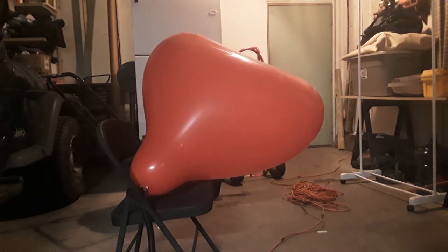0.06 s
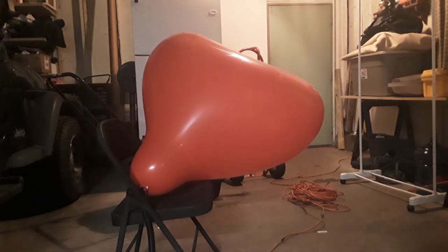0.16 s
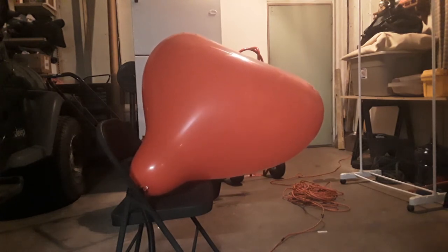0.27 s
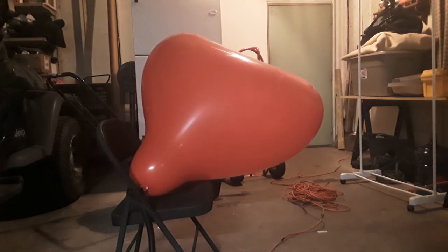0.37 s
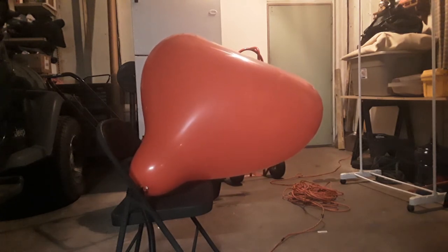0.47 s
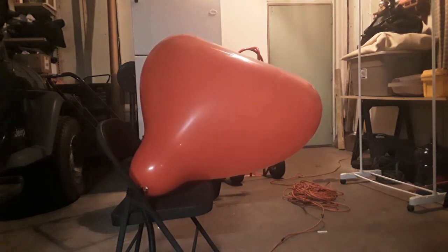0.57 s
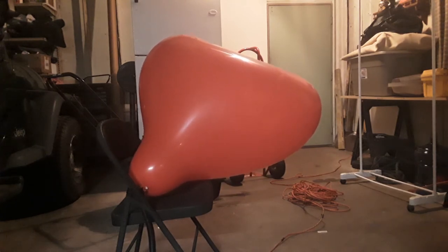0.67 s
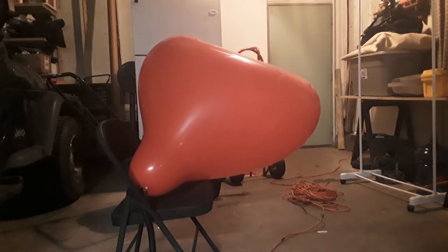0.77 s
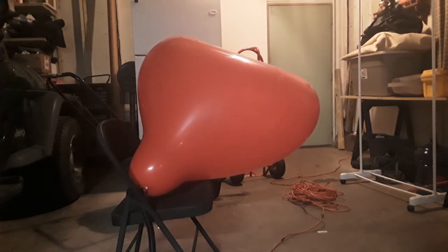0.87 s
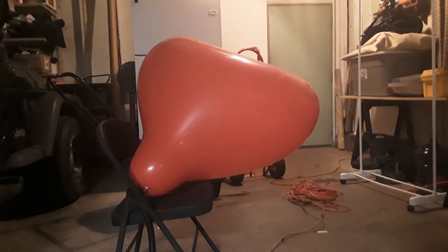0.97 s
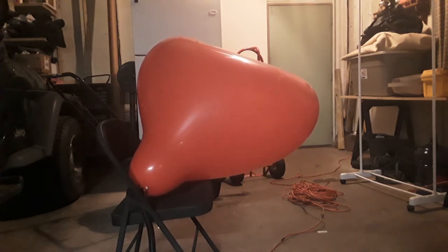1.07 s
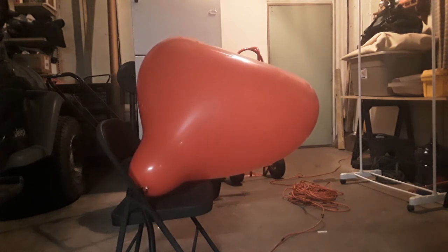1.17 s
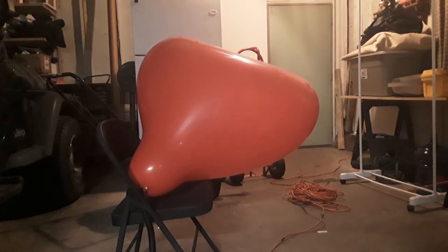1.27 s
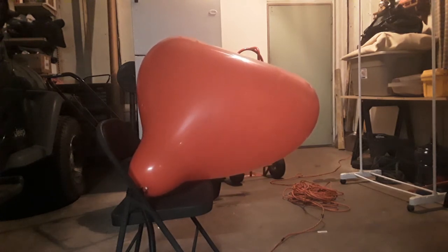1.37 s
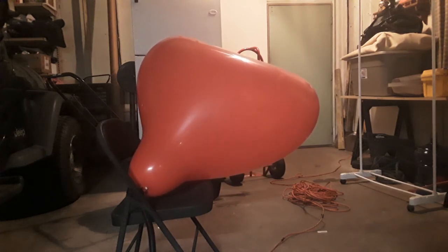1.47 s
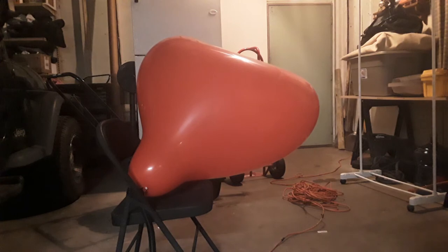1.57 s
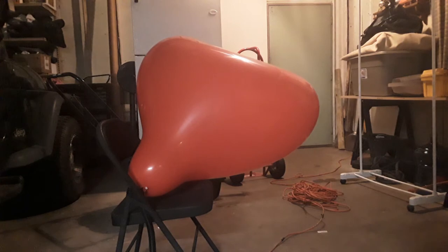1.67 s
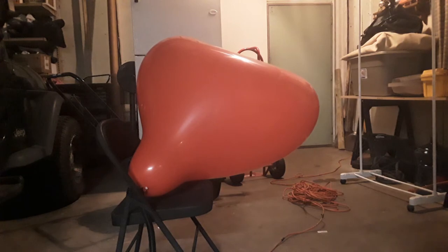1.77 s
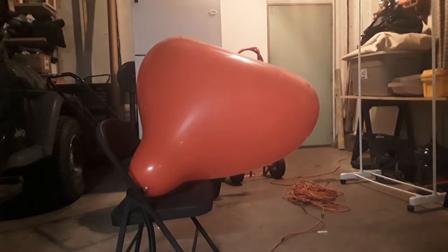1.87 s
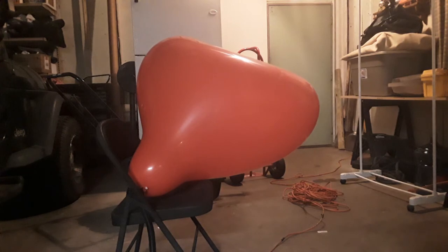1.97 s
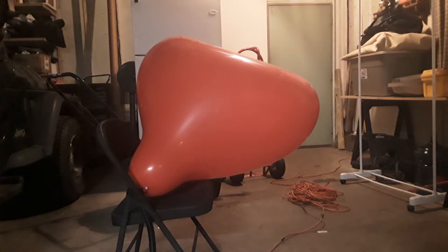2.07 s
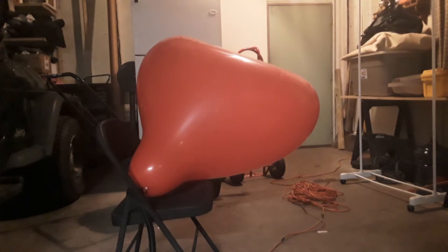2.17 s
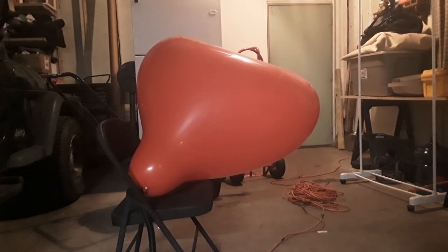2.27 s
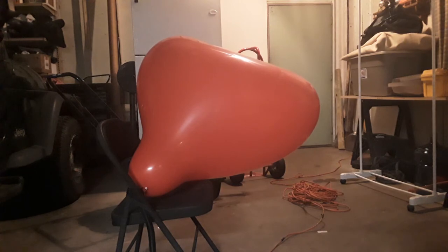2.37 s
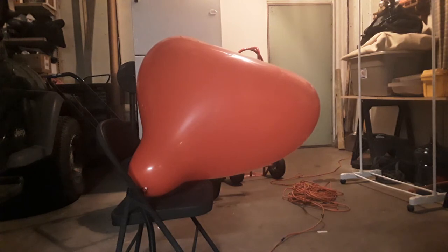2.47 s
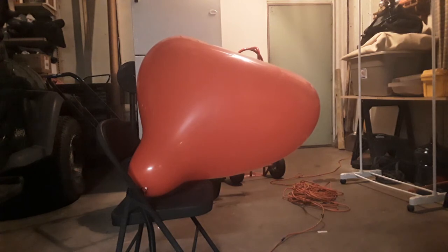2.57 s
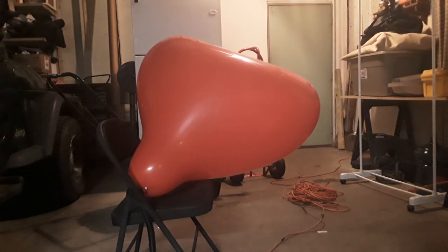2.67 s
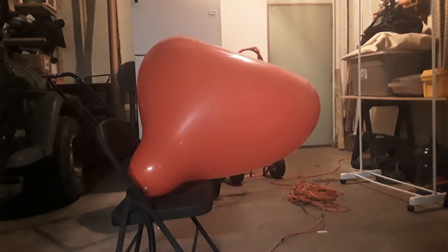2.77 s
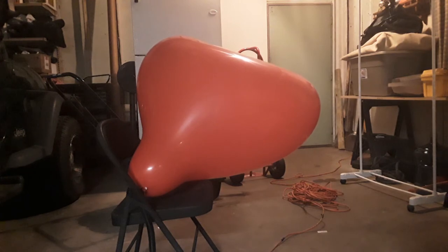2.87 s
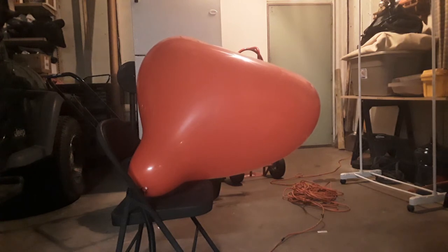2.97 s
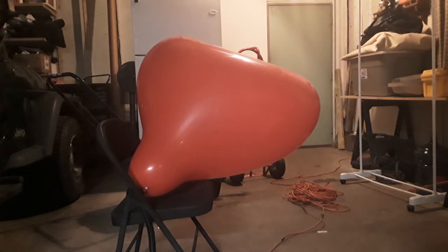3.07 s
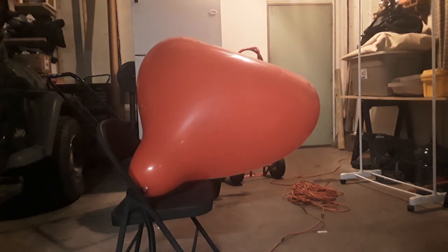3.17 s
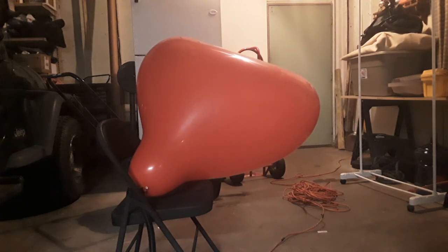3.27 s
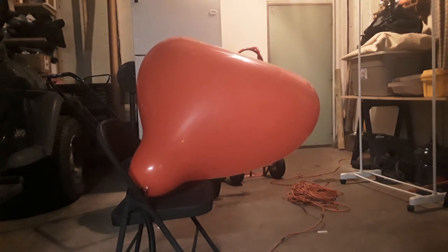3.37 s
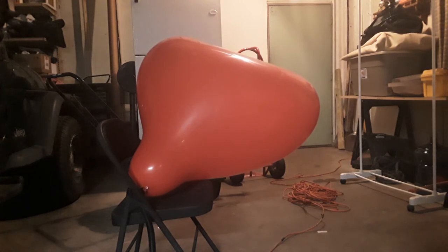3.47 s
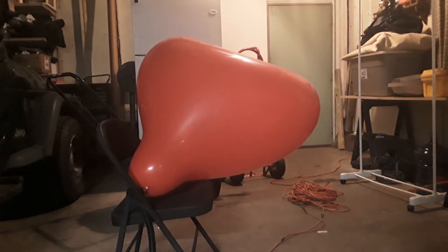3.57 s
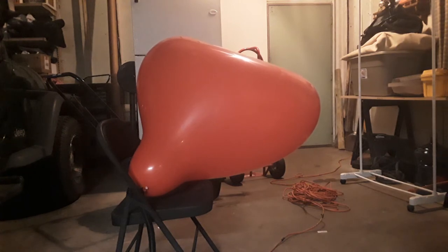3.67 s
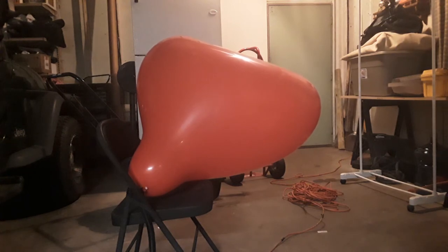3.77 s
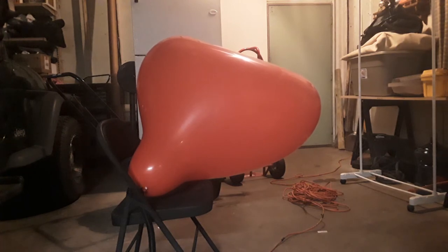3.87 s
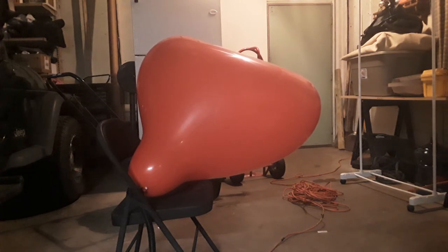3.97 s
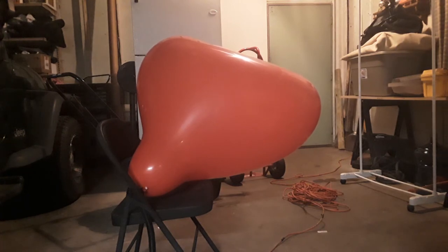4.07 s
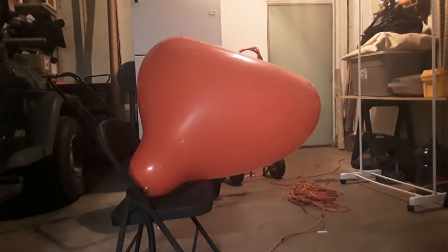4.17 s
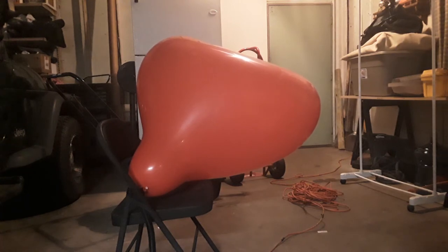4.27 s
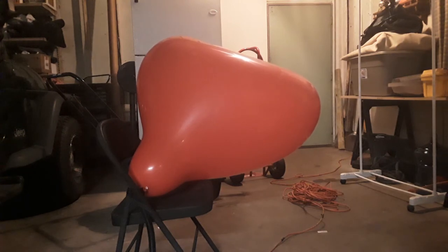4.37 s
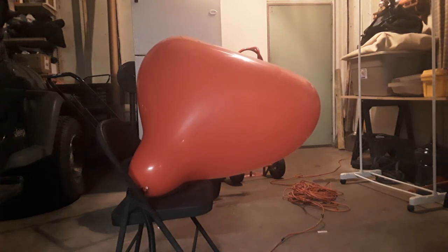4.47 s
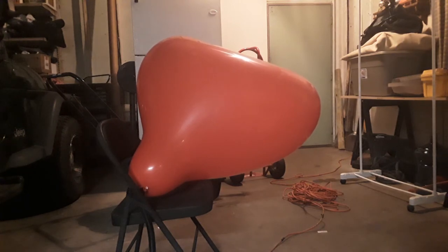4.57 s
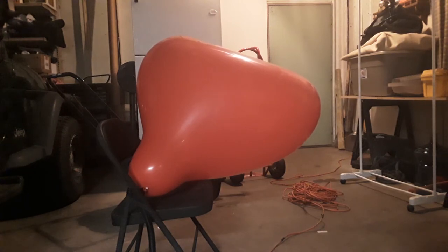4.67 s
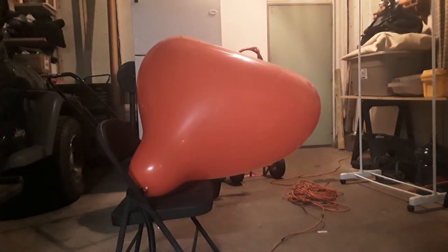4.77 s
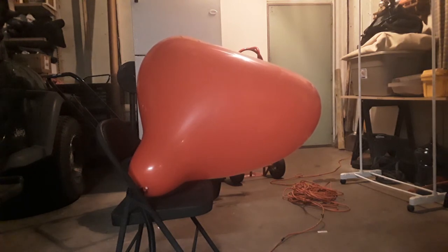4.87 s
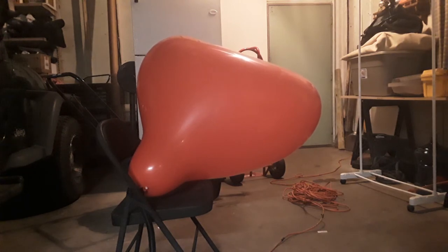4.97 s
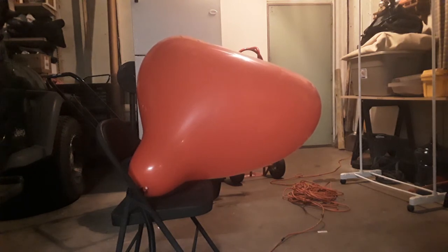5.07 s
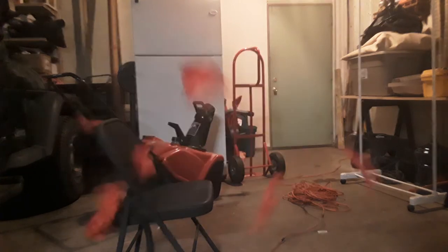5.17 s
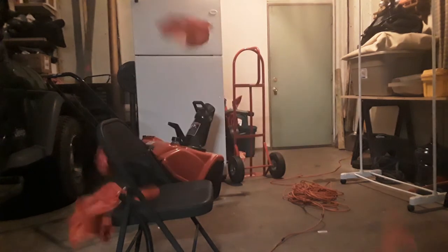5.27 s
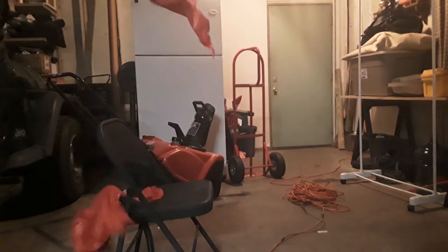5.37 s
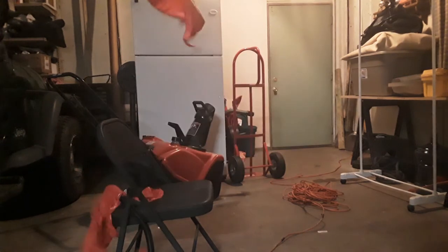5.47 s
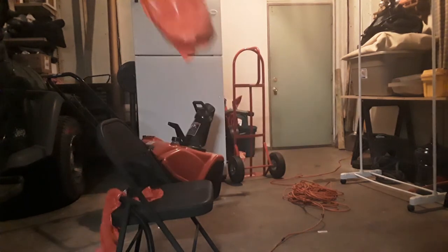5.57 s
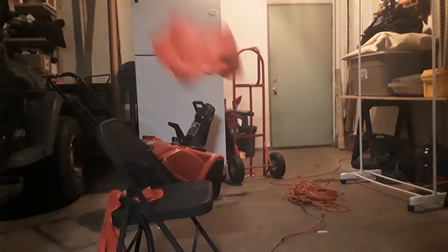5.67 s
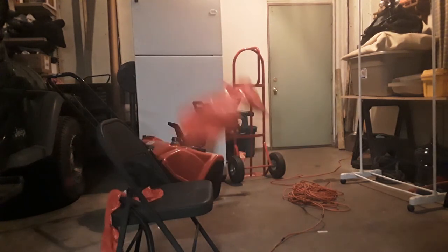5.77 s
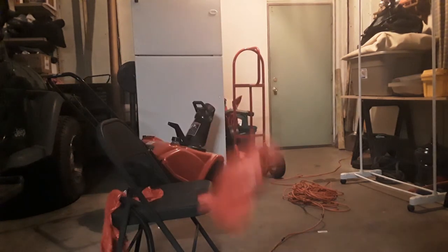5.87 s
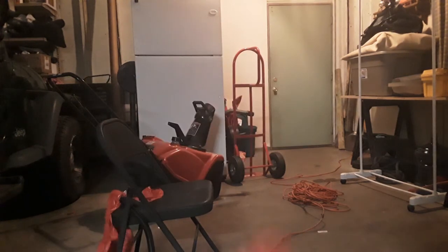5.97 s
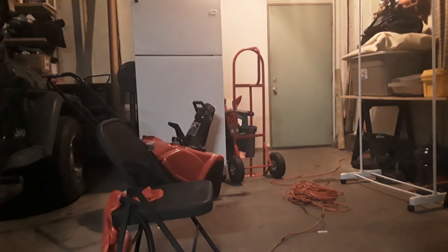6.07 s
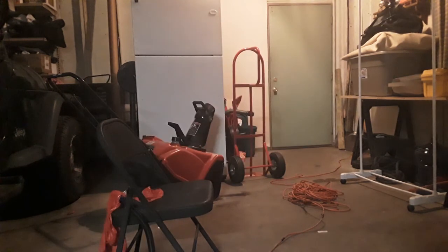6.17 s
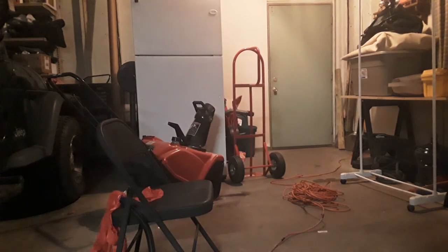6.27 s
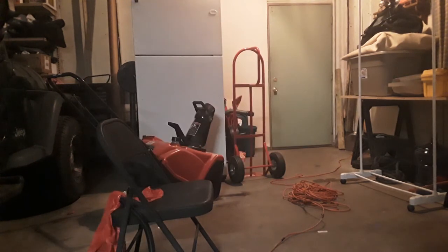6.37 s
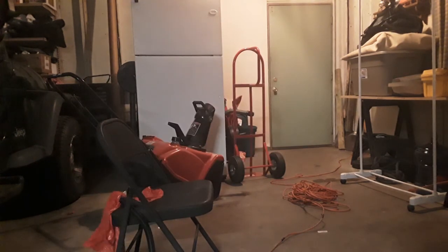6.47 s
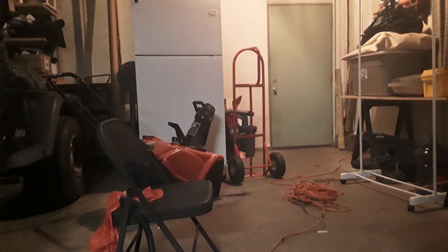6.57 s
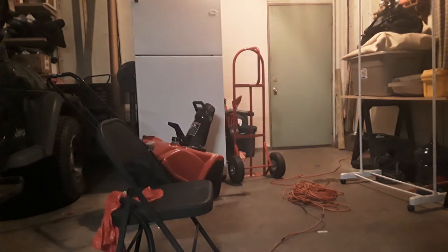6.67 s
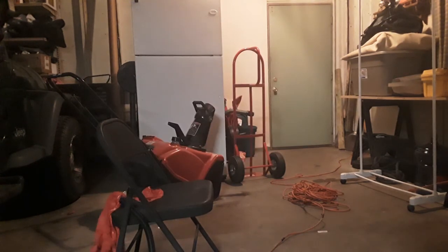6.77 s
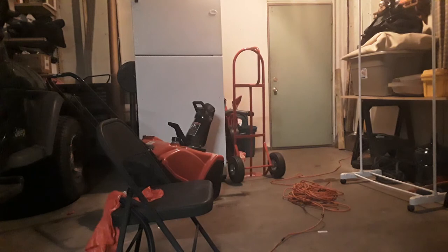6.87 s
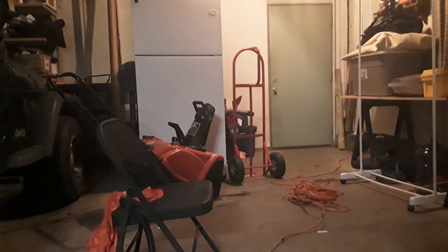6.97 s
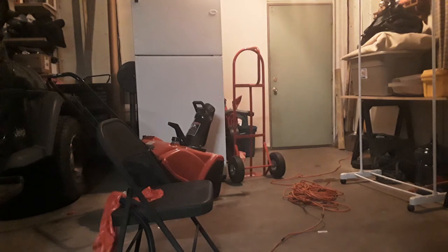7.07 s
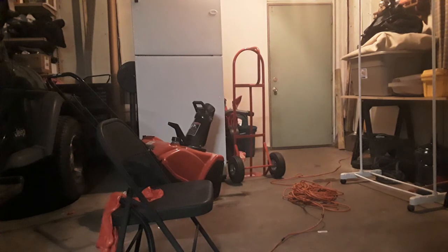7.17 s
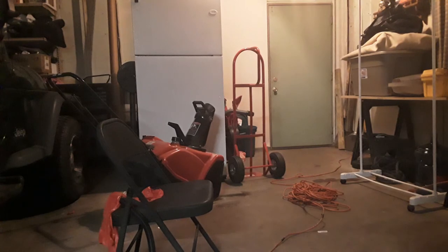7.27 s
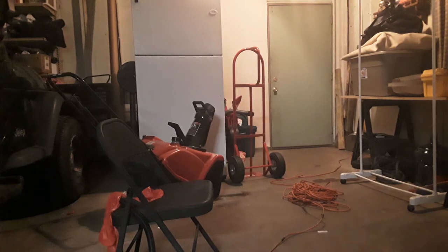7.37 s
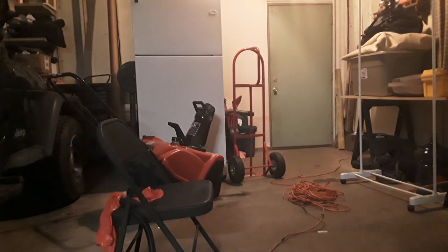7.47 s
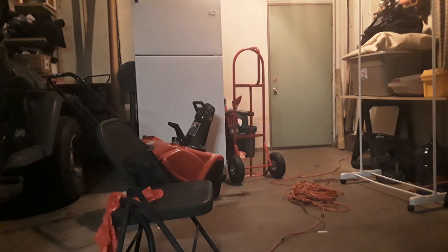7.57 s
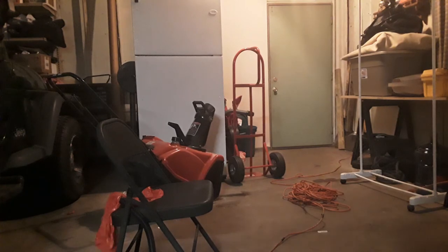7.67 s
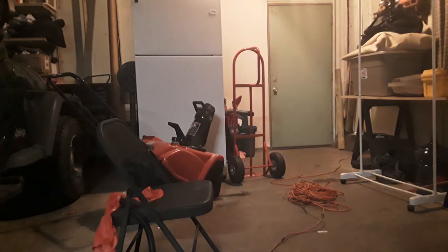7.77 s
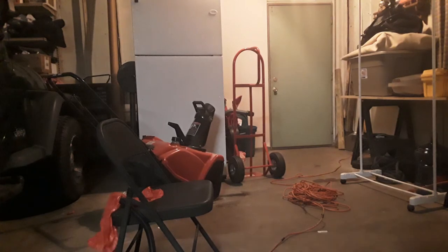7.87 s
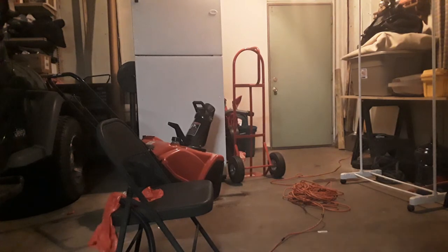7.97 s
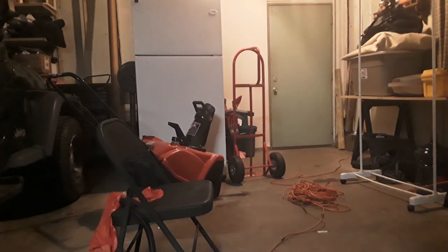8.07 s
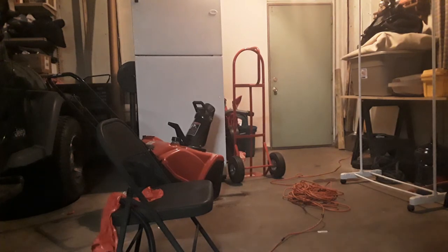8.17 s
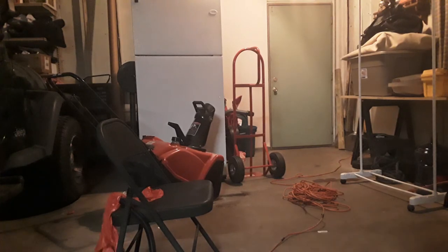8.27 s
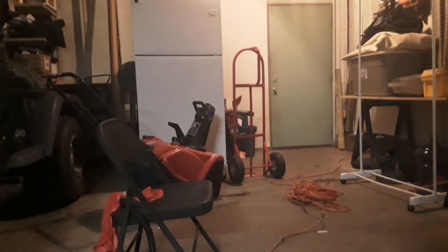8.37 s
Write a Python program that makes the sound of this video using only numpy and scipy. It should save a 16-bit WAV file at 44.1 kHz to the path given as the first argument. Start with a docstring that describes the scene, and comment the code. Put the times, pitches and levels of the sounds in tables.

```python
"""Motor whines over rushing air: an electric blower fills a large latex balloon in a garage.
The whines are sines on shaft orders; the air is noise coloured by resonances and broad humps.
The balloon bursts: a pressure front, then the garage roars; the unloaded fan drags the motor slower.
The recorder's gain control drops hard at the bang, holds, and lets the blower swell back."""
import sys
import numpy as np
from scipy import signal
from scipy.fft import rfft, irfft, next_fast_len
from scipy.io import wavfile
from scipy.ndimage import uniform_filter1d

SR = 44100
rng = np.random.default_rng(int(sys.argv[2]) if len(sys.argv) > 2 else 0)


def file_out(sig):
    """Save sig as 16-bit WAV at sys.argv[1]."""
    # one column per channel
    cols = np.atleast_2d(sig).T
    # limit, then scale
    lim = np.clip(cols, -1, 1)
    pcm = np.round(lim * 32767).astype(np.int16)
    wavfile.write(sys.argv[1], SR, pcm)


N = 372202
BURST_S = 5.125

# All source levels are ahead of the recorder.
# motor speed, sagging once the fan moves free air: [t/s, speed/(turns/s)]
MOTOR_SPEED = [(0, 348.7), (.3, 348.96), (.5, 349.09), (1.1, 349.18), (1.7, 349.2), (1.95, 349.31),
               (2.45, 349.1), (3.1, 349.47), (3.5, 349.34), (4.1, 349.05), (4.5, 349.07), (4.7, 349.28),
               (4.95, 349.17), (5.12, 349.3), (5.4, 341.66), (5.5, 339.5), (5.6, 338.25), (5.7, 337.07),
               (5.9, 335.85), (6.4, 335.09), (6.9, 336.02), (7.2, 336.37), (7.65, 336.93), (8.2, 336.76),
               (8.44, 336.9)]
# prominent whine orders, level following pitch: [order]
WHINE_ORDERS = (8, 10, 16, 20, 24, 32)
# garage answer to a pure tone, different every few Hz, so whines swell and fade with speed:
# [f/Hz, left rms level/dB, right rms level/dB, left lead/rad]
WHINE_ANSWER = [(2682, -36, -40, 1), (2685, -38, -38, 0), (2687, -27.5, -33, 1), (2690, -25, -24, 1),
                (2690.5, -24.5, -23, 1.6), (2692, -35, -29.5, 2.7), (2695, -32, -31, 4),
                (2700, -23, -21, 3.4), (2701, -33, -23, 2), (2706.5, -22, -21.5, .2), (2712, -19, -20, 1.9),
                (2720, -21, -30, 4.5), (2728, -15, -18, 9), (2791, -24.5, -27, 3), (2791.6, -37, -31, 2),
                (2792, -31, -26, -0.3), (2793, -25, -22, 0.25), (2795.4, -20, -19.5, 0.45),
                (3349, -31, -31, 0), (3340, -34, -32, 2), (3369, -33.5, -32.5, 1.4), (3375, -40, -39, 0),
                (3488, -36, -32, -1.5), (3494, -35, -31.5, -2.5), (5362, -40, -38, 2),
                (5371, -36, -36, 3.5), (5374, -28, -29, 5.4), (5380.5, -30, -29, 7),
                (5383.5, -45, -38, 9.5), (5386, -32, -32.5, 9), (5397, -40, -29, 6), (5406, -37, -27, 6),
                (5410, -24, -20, 1), (5417, -21, -17, .3), (5422, -35, -24, 2.8), (5434, -22, -21, 2),
                (5450, -28, -26, -.5), (5464, -24, -20, -1), (5580, -27.5, -30, -3), (5588, -27, -24, -2.6),
                (5591, -29.5, -28, -2.5), (5587, -42, -32, -2.5), (6690, -46, -42, -2),
                (6760, -40, -37, -1), (6760, -45, -43, -1), (6990, -45, -54, -4), (6990, -42, -39, -2.5),
                (6920, -46, -40, -1.7), (7000, -49, -49, -1), (8020, -51, -47, 1), (8070, -42, -42, 2),
                (8067, -45, -48, 0), (8080, -49, -49, 2), (8371, -46, -44, -5), (8376, -39.5, -42, -2.8),
                (10726, -52, -56, -1), (10745, -46, -44, .3), (10768, -57, -54, 0), (10792, -45, -43, 0),
                (10860, -60, -52, 1.7), (11161, -50, -48, .5), (11168, -45, -45, -.8),
                (11176, -50, -49, -2)]
# quick unsteadiness of the whines: [with balloon rms/dB, blowing free rms/dB]
WHINE_FLUTTER_DB = (1.0, 1.4)
# slow level and phase waver of the whines above 5 kHz, a dip near 2.5 s, then back:
# [t/s, level waver/dB, left phase waver/rad]
HIGH_WHINE_WAVER = [(0, 0, 0), (.75, 1.5, 0), (1.3, -0.5, 0.65), (1.8, -2, 0.2), (2.5, -5.5, 0),
                    (2.9, -1.5, 0), (3.6, 0.5, 0), (5.0, 1.5, 0.06), (5.2, 0, 0)]
# other shaft orders: [order, level with balloon/dB, level after burst/dB, left-right/dB,
# left lead/rad, waver rms/dB]
OTHER_ORDERS = [(1, -29, -33, -1.5, .2, .8), (4, -36, -37, -2, .6, 1.5), (27, -58, -62, 0, .5, 3),
                (28, -55, -53, -3, -1, 3), (33, -59, -61, 0, .5, 3), (40, -59, -63, 0, 1.2, 3)]
# faint steady hum: [f/Hz, rms level/dB]
HUM = (161, -42.5)
# air spectrum, balloon on the nozzle: [f/Hz, relative density/dB]
AIR_FILLING = [(40, -27), (130, -8.5), (200, -10.5), (300, -10), (420, 1), (800, -3), (1300, -6),
               (1850, -1), (2400, -5.5), (3300, -1.5), (5000, -9), (8500, -15), (12000, -21), (16000, -32)]
# air spectrum, blowing free: [f/Hz, relative density/dB]
AIR_FREE = [(40, -26), (130, -8), (200, -8), (300, -7), (420, -1), (700, -4), (1300, -7), (1900, -2),
            (2400, -5), (3300, -2.5), (4900, -8.5), (5250, -2.5), (5650, -10), (8500, -16), (12000, -21),
            (16000, -31.5)]
# narrow resonances and a few broad humps and dips in the air sound:
# [f/Hz, width/Hz, left lift/dB, right lift/dB]
AIR_RESONANCES = [(263, 18, -1.5, 3), (300, 25, -6, -5), (380, 17, 4, 1), (436, 17, 0, 3),
                  (481, 39, -11, -7.5), (588, 25, -3.5, -3), (628.5, 27, 5, 6), (646, 20, -6, -2),
                  (676, 23, 4.5, 1), (745, 18, 5.5, 5.5), (775, 14.6, -10, -5.5), (797, 18, 11, 8.5),
                  (814, 21, -6.5, -7), (830, 23, 0.5, 3.5), (930, 31, 8, 2), (1009.6, 24, -2, 12.5),
                  (1044, 14, -3, -5), (1089, 40, 6, 4), (1160, 24, 8.5, -2), (1274, 46, -10.5, 6),
                  (1460, 36, 3.5, 2), (1630, 40, 8.5, 1), (1754, 66, 3, 7.5), (1937, 43, 7, 0),
                  (2143, 28, 2, 8.5), (3330, 56, 2.5, 3), (4610, 55, 5, 5.5), (5330, 270, 2.5, 2.5),
                  (8600, 1300, -4, -4.5), (10400, 1170, 6, 7)]
# likeness of the two microphones, blower air: [f/Hz, likeness/(0-1)]
ALIKE_AIR = [(60, 0.65), (290, 1), (640, 0.78), (900, 0.01), (1150, 0.41), (1500, 0.09), (3000, 0),
             (15000, 0.92)]
# garage roar after the burst: [f/Hz, relative density/dB, t60/s, build-up/s]
ROAR = [(40, 2, 0.43, 0.017), (160, -2.5, 0.46, 0.046), (250, 13.5, 0.4, 0.11), (392, 8.5, 0.45, .13),
        (650, 4.5, 0.38, .12), (1170, -7, 0.47, 0.012), (1850, -0.5, 0.51, 0.018),
        (3950, -1.5, 0.46, 0.012), (8400, -10, 0.39, 0.0037), (13700, -9, 0.28, 0.00075),
        (16100, -9.5, 0.29, 0.0009)]
# likeness of the two microphones, diffuse roar: [f/Hz, likeness/(0-1)]
ALIKE_ROAR = [(60, .5), (290, 0.91), (640, 0.49), (1400, .05), (15000, .05)]
# recorder bass filter: [f/Hz, gain/dB]
LOW_CUT = [(60, -17.5), (140, -23), (200, -9), (300, -1), (420, 0)]

AIR_DB, AIR_LEFT_DB, AIR_LEFT_LEAD_S = -19.5, -0.38, 0.0001397
BLAST_DB, ROAR_DB = 34, 17.5
BAND_EDGE_HZ = 15780


def gain_of(db):
    """Decibels to amplitude."""
    return 10 ** (np.asarray(db) / 20)


def evened(x):
    """Scales to rms 1."""
    return x / np.sqrt(np.mean(abs(x) ** 2) + 1e-20)


def curves(rows, x):
    """Table columns over time or pitch, joined by straight lines."""
    nodes, *columns = np.transpose(rows)
    return np.array([np.interp(x, nodes, column) for column in columns])


def read(points, hz, order=1):
    """One column of a spectrum table on a log-frequency axis."""
    table = np.transpose(points)
    return np.interp(np.log(hz + 1), np.log(table[0] + 1), table[order])


def drift(t, low_hz, top_hz):
    """Slow chance of rms 1: sines of random phase, stronger when slower."""
    rates_hz = np.geomspace(low_hz, top_hz, num=16)
    return evened(sum(np.sin(2 * np.pi * (f * t + rng.random())) / np.sqrt(f) for f in rates_hz))


def noise(size, magnitude, alike, lead_s):
    """Stereo noise from random short-time spectra, shaped by magnitude(hz, t)."""
    hop = size // 4
    hz = np.fft.rfftfreq(size, 1 / SR)
    t = np.arange(N // hop + 5) * hop / SR
    a, b, c, d = rng.standard_normal((len(t), len(hz), 4)).T
    same = np.clip(read(alike, hz), 0, 1)[:, None]
    right = a + 1j * b
    left = same * right + np.sqrt(1 - same ** 2) * (c + 1j * d)
    left = left * np.exp(2j * np.pi * hz * lead_s)[:, None]
    spectra = np.array([left, right]) * magnitude(hz, t)
    return signal.istft(spectra, nperseg=size, noverlap=size - hop)[1][:, :N]


def motor():
    """Sines on whole multiples of the shaft speed, plus a fixed hum."""
    t = np.arange(N) / SR
    coarse_s = t[::441]
    speed = curves(MOTOR_SPEED, t)[0]
    shaft_rad = 2 * np.pi * np.cumsum(speed) / SR
    out = np.zeros((2, N))
    flutter_db = np.where(t < BURST_S, *WHINE_FLUTTER_DB)
    for k in WHINE_ORDERS:
        *level_db, lead_rad = curves(WHINE_ANSWER, k * speed)
        shake_db = flutter_db * np.interp(t, coarse_s, drift(coarse_s, low_hz=9.0, top_hz=44.98))
        slow_db, slow_rad = (k * speed > 5000) * curves(HIGH_WHINE_WAVER, t)
        tones = np.sin([k * shaft_rad + lead_rad + slow_rad, k * shaft_rad])
        out += gain_of(level_db + shake_db + slow_db) * tones
    for k, full_db, free_db, pan_db, lead_rad, waver_db in OTHER_ORDERS:
        level_db = np.where(t < BURST_S, full_db, free_db)
        for side, half in enumerate((.5, -.5)):
            wobble_db = waver_db * np.interp(t, coarse_s, drift(coarse_s, low_hz=0.394, top_hz=8.7))
            tone = np.sin(k * shaft_rad + half * lead_rad)
            out[side] += gain_of(level_db + half * pan_db + wobble_db) * tone
    hum_hz, hum_db = HUM
    out += gain_of(hum_db) * np.sin(2 * np.pi * hum_hz * t)
    return np.sqrt(2) * out  # rms levels to peak


def air():
    """Turbulent air from fan and nozzle, slightly patchy; its colour changes when the balloon is gone."""
    def magnitude(hz, t):
        """Air colour, resonances and chance, as amplitude."""
        patches = rng.standard_normal((len(t), len(hz))).T
        patches = uniform_filter1d(patches, size=24, axis=0)
        patches_db = 1.72 * evened(uniform_filter1d(patches, size=3, axis=1))
        filling_db, free_db = read(AIR_FILLING, hz)[:, None], read(AIR_FREE, hz)[:, None]
        colour_db = np.where(t < BURST_S, filling_db, free_db)
        lift_db = sum(np.outer(db, 1 / (1 + (2 * (hz - f) / width) ** 2))
                      for f, width, *db in AIR_RESONANCES)
        # countless smaller standing waves
        ripple_db = 2.4 * uniform_filter1d(rng.standard_normal((len(hz), 2)).T, size=2)
        swell_db = .3 * drift(t, low_hz=.4, top_hz=8.0)
        fixed_db = (lift_db + ripple_db)[:, :, None]
        return gain_of(colour_db + fixed_db + patches_db + swell_db)

    rush = evened(noise(4096, magnitude, ALIKE_AIR, AIR_LEFT_LEAD_S))
    return gain_of(AIR_DB) * rush * gain_of([[AIR_LEFT_DB], [0]])


def burst():
    """A pressure front that swings to suction, then a decaying roar whose bands build up at their own pace."""
    t = np.arange(N) / SR - BURST_S
    push_s, pull_s = .0009, .0005
    front = np.clip(t / .0001, 0, 1) * (t < push_s + pull_s)
    swing = np.clip((push_s - t) / 0.00014, -1.4, 1)
    blast = front * swing * np.exp(-np.clip(t, 0, push_s) / 0.0031)

    def magnitude(hz, frame_s):
        """Build-up, clumping and decay per band, as amplitude."""
        age_s = np.maximum(frame_s - BURST_S, 0)
        level_db, t60_s, build_s = (read(ROAR, hz, order=k)[:, None] for k in (1, 2, 3))
        growth = 1 - 0.89 * np.exp(-(age_s / np.maximum(build_s, 1e-4)) ** 2)
        clumps = rng.standard_normal((len(frame_s), len(hz))).T  # echoes arrive in clumps
        clumps = uniform_filter1d(clumps, size=5, axis=0)
        slaps_db = 2.5 * evened(uniform_filter1d(clumps, size=3, axis=1))
        decay_db = 60 * age_s / t60_s
        return growth * gain_of(level_db + slaps_db - decay_db) * (frame_s > BURST_S - .01)

    roar = noise(512, magnitude, ALIKE_ROAR, 0) * (t > push_s + pull_s)
    return gain_of(BLAST_DB) * blast + gain_of(ROAR_DB) * roar


def scene():
    """Blower and burst at the two microphones."""
    return motor() + air() + burst()


def record(dry):
    """Slow gain control with a hold, a quick limiter, clipping, bass filter, band limit."""
    t = np.arange(N) / SR
    power = abs(uniform_filter1d((dry ** 2).mean(0), size=200, origin=60))
    power_db = 10 * np.log10(power + 1e-12)
    since_overload_s = t - np.maximum.accumulate(np.where(power_db > -6, t, -10))
    hold_s, release_s = .97, .7
    duck_db = 16.44 * np.clip(1 - (since_overload_s - hold_s) / release_s, 0, 1) ** 2.12
    over_db = np.maximum(power_db - duck_db + 9.0, 0)  # limiter threshold -9 dB
    fall_db = t * 300  # limiter recovery, 300 dB/s
    over_db = np.maximum.accumulate(over_db + fall_db) - fall_db
    quiet = dry / gain_of(uniform_filter1d(duck_db + over_db, size=60))
    clipped = np.clip(quiet, -.95, .95)
    size = next_fast_len(N + 4096)
    bass_gain = gain_of(read(LOW_CUT, np.fft.rfftfreq(size, 1 / SR)))
    thinned = irfft(rfft(clipped, size) * bass_gain, size)[:, :N]
    band = signal.firwin(1023, BAND_EDGE_HZ, window=("kaiser", 9), fs=SR)
    return np.clip(signal.oaconvolve(thinned, band[None], "same"), -1, 1)


dry = scene()
out = record(dry)
file_out(out)
```